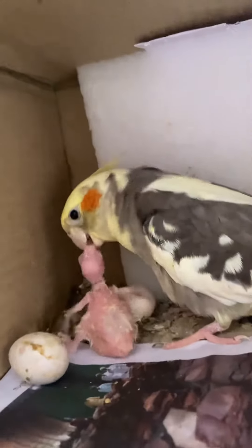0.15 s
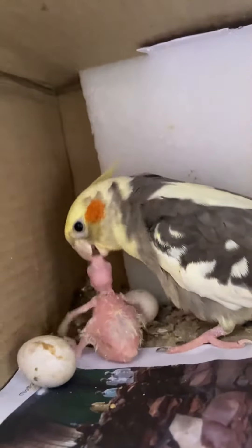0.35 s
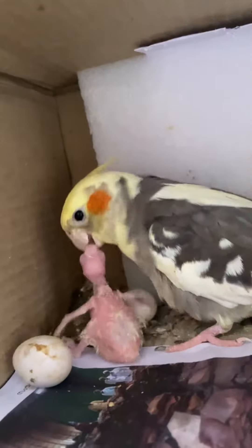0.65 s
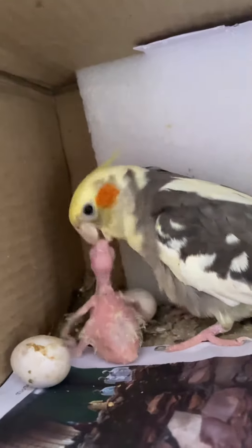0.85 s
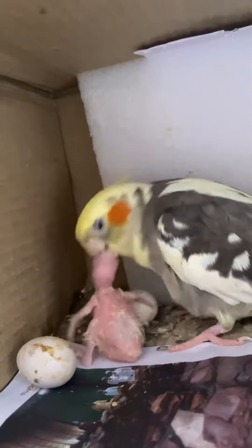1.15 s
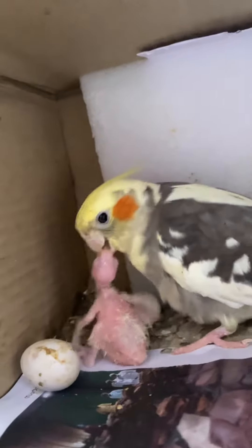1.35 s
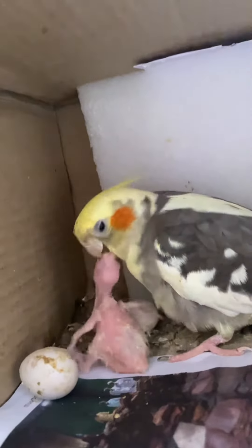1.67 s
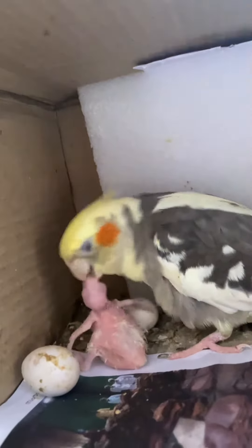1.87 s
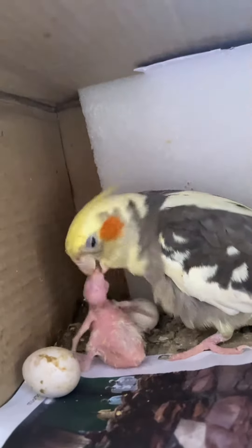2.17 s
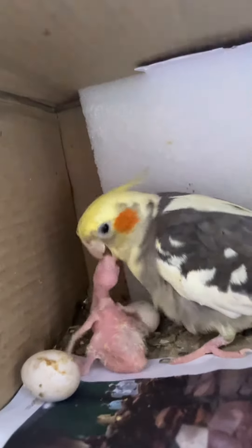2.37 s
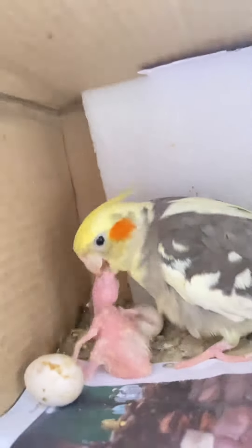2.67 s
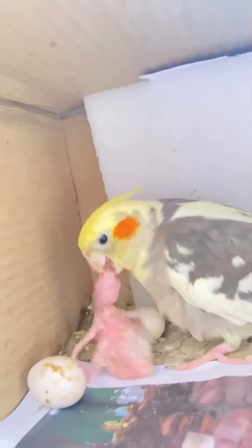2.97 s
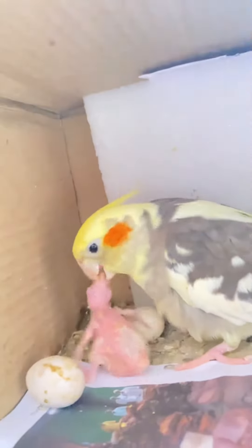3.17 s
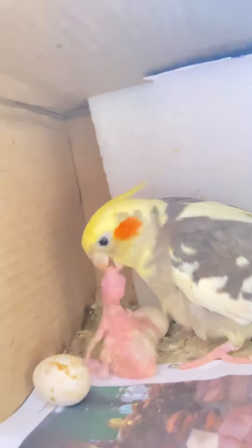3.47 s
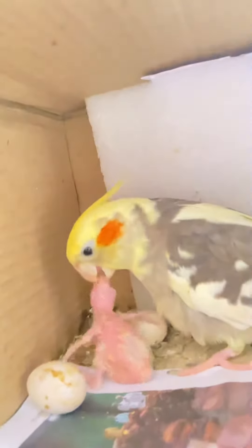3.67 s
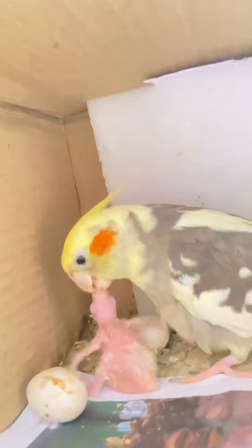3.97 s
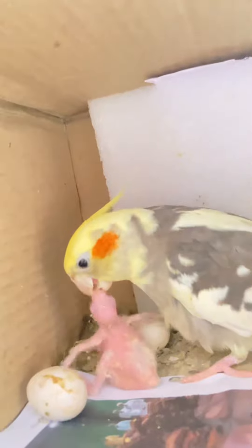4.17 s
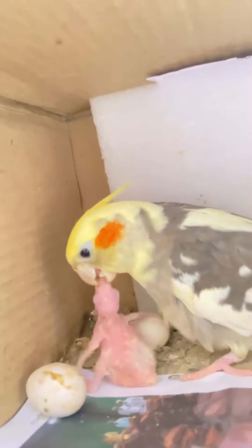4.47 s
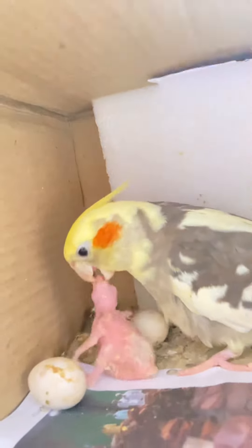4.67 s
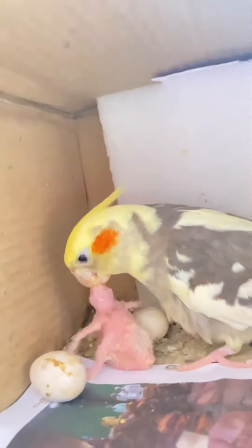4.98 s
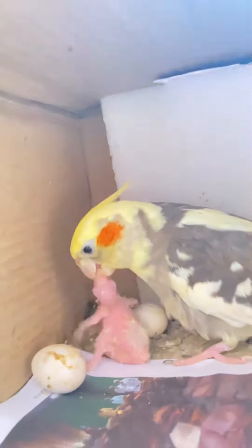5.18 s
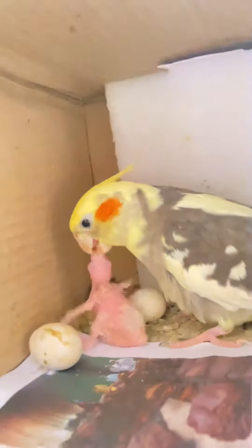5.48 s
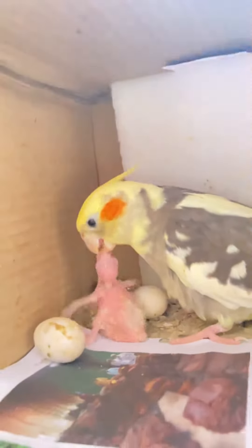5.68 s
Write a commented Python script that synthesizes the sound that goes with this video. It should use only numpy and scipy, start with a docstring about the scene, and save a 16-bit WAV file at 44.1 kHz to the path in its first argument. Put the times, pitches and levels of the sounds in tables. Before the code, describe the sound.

A close stereo sound inside a cardboard nest box lasts nearly six seconds. A tiny chick squeaks regularly, about five times a second from 0.2 s to the end; each squeak is a very short, bright, fast downward sweep around 4 to 5 kHz, with shrill overtones. Between them come wet clicks, smacks and a grainy, moist rustle, busier at the start, around 2 s and at the end. A sharp click falls at 1.5 s and a hollow beak tap at 4.0 s. Dull cardboard bumps occur at 0.95, 4.55, 5.3 and, strongest, 5.7 s, with weaker ones between. In the reverberant room behind, another bird gives a loud harsh leaping chirp at 0.65 s and a rough, weaker one at 5.1 s. Faint pure whistles climb slowly and drop near 2.1 and 4.3 s, one just ending at the start. Low rumble, wavering hum and thin hiss continue, the rumble heaviest in the first moments.

```python
"""In a cardboard nest box, close to the microphone, a cockatiel feeds its tiny chick.
The chick's squeaks are quick downward sweeps, about five a second. Noise bursts make wet beak clicks,
and sliding low tones make the bumps of the pumping adult against the box.
Farther off in the room, other birds give two harsh chirps and slow arched whistles, built from gliding
tones. Beneath lie a low rumble, hum and hiss, made of filtered noise and low tones."""
import sys
import numpy as np
from scipy import signal
from scipy.fft import rfft, irfft, next_fast_len
from scipy.io import wavfile
from scipy.ndimage import uniform_filter1d

SR = 44100
rng = np.random.default_rng(int(sys.argv[2]) if len(sys.argv) > 2 else 0)


def transcribe(signal):
    """Save signal, clipped to [-1, 1], as a 16-bit WAV file at the path in sys.argv[1]."""
    frames = np.atleast_2d(signal).T
    limited = np.clip(frames, -1, 1)
    pcm = np.round(limited * 32767).astype(np.int16)
    wavfile.write(sys.argv[1], SR, pcm)


N = 257103
TIME = np.arange(N) / SR


def from_db(db):
    """Turn decibels into an amplitude factor."""
    return 10 ** (np.asarray(db) / 20)


def rms_one(x):
    """Scale a sound to an rms level of 1."""
    return x / np.sqrt(np.mean(x ** 2) + 1e-20)


def in_time(rows):
    """Join the points of a curve by straight lines, one value per sample for each column."""
    s, *columns = np.transpose(rows)
    return [np.interp(TIME, s, column) for column in columns]


def add(out, s, sound):
    """Mix a short sound in at time s."""
    i = max(round(s * SR), 0)
    out[i:i + len(sound)] += sound[:N - i]


def gate(start, end, attack_s, release_s):
    """Rise from 0, hold at 1 and fall back to 0."""
    rise = (TIME - start) / attack_s
    fall = (end - TIME) / release_s
    return np.clip(np.minimum(rise, fall), 0, 1)


def flutter(rate_hz, size=N):
    """Smooth random wandering with an rms of 1: noise through two equal low-pass stages."""
    r = np.exp(-2 * np.pi * rate_hz / SR)
    return rms_one(signal.lfilter([1], [1, -2 * r, r * r], rng.standard_normal(size)))


def colour(x, spectrum):
    """Boost or cut each pitch region, following (f/Hz, level/dB) points."""
    hz, db = np.transpose(spectrum)
    size = next_fast_len(N)
    bins = np.maximum(np.fft.rfftfreq(size, 1 / SR), 1)
    gain = from_db(np.interp(np.log(bins), np.log(hz), db))
    return irfft(rfft(x, size) * gain, size)[..., :N]


def echoes(x, returns):
    """A sound with its separate returns from walls, each a delayed copy."""
    return x + sum(from_db(db) * np.pad(x, (round(delay * SR), 0))[:N] for delay, db in returns)


# how far the right microphone port lags behind the left: (f/Hz, phase lag/rad)
PORT_PHASE_LAG = [(0, 0), (400, .6), (1400, 2.4), (3000, 2.3), (3650, 2.0), (3900, 4.3), (4400, 4.9),
                  (5300, 6.6), (7900, 9.3), (11700, 12.5), (13800, 12.7), (16000, 15)]


def ports(x):
    """Sound reaches the right port a little after the left one, as a phase lag that depends on pitch."""
    size = next_fast_len(N + 512)
    lag = np.interp(np.fft.rfftfreq(size, 1 / SR), *np.transpose(PORT_PHASE_LAG))
    right = irfft(rfft(x, size) * np.exp(-1j * lag), size)[:N]
    return np.array([x, right])


def reverb(x, t60, gap_s, apart_db=-8):
    """Dense reflections that start after a gap and die away, partly different at each port."""
    t = TIME[:int((t60 + gap_s) * SR)]
    tails = rng.standard_normal((3, len(t))) * from_db(-60 * t / t60) * (t > gap_s)
    tails /= np.sqrt(np.sum(tails ** 2, axis=1, keepdims=True))
    wet = signal.fftconvolve(x[None], tails, axes=1)[:, :N]
    return ports(wet[0]) + from_db(apart_db) * wet[1:]


# spectrum of the rumble, before its level curve: (f/Hz, level/dB per Hz)
RUMBLE_SPECTRUM = [(20, -89), (40, -79), (62, -81.5), (95, -71), (160, -77.5), (300, -86), (420, -96),
                   (700, -97.5), (1350, -102), (1800, -113), (2700, -114), (5000, -120), (10000, -130)]
# spectrum of the hiss: (f/Hz, level/dB per Hz)
HISS_SPECTRUM = [(2400, -126), (3100, -112), (3700, -107), (5200, -112), (8000, -117), (9500, -102),
                 (10800, -121), (16000, -126)]
# hum tones, before the wavering and the rumble's level curve: (f/Hz, rms level/dB)
HUM_TONES = [(58.3, -54), (80.5, -54), (140, -60.5)]
# level curve of the rumble and hum: (t/s, level/dB)
RUMBLE_LEVEL = [(0, 10), (.35, 2.5), (5.8, -0.5)]


def background(apart_db=-10, waver=0.8):
    """Low rumble and faint hiss from coloured noise, with hum tones that waver in strength and phase."""
    white = rng.standard_normal((3, N)) * np.sqrt(SR / 2)
    swell = from_db(in_time(RUMBLE_LEVEL)[0])
    noise = swell * colour(white, RUMBLE_SPECTRUM) + colour(white[::-1], HISS_SPECTRUM)
    hum = np.zeros(N)
    for hz, db in HUM_TONES:
        strength = from_db(db) * np.sqrt(2) * (1 + waver * flutter(4.3))
        hum += strength * np.sin(2 * np.pi * hz * TIME + flutter(2.9))
    return ports(noise[0] + swell * hum) + from_db(apart_db) * noise[1:]


# the narrow band of the distant chirr: (f/Hz, level/dB)
CHIRR_COLOUR = [(2400, -6.5), (3200, 11), (3650, 12.5), (4300, -2), (7000, -76)]


def chirr(flutter_hz=3, level_db=-67, swell_db=4.5):
    """A faint, narrow, distant hiss whose level comes and goes at random."""
    hiss = rms_one(colour(rng.standard_normal(N), CHIRR_COLOUR))
    return from_db(level_db + swell_db * flutter(flutter_hz)) * hiss


# a whistle starts this long before its top and nearly this far below it; the bend is the final climb's width
CLIMB_S, CLIMB_OCTAVES, CLIMB_BEND_S = .39, .3, .1
# it holds near the top briefly, then drops and fades
TOP_HOLD_S, DROP_OCTAVES_PER_S, DROP_DB_PER_S = .045, 5.2, 90
WHISTLE_JITTER = .003  # share by which the pitch wanders
# far whistles: (t of the top/s, top f/Hz, level at the top/dB, swell before it/dB per s)
WHISTLES = [(-.05, 1414, -42, 32), (2.114, 1378, -43, 46), (4.301, 1416, -44, 20)]


def whistles(knee_s=0.0092, attack_s=0.037, drop_s=0.077):
    """An almost pure tone that swells as it climbs slowly, then falls quickly and fades."""
    out = np.zeros(N)
    for top_s, top_hz, db, swell_db_per_s in WHISTLES:
        to_top = np.maximum(top_s - TIME, 0)
        # time spent dropping, with a rounded start
        dropping = knee_s * np.logaddexp(0, (TIME - top_s - TOP_HOLD_S) / knee_s)
        climb = CLIMB_OCTAVES * to_top ** 2 / (to_top ** 2 + CLIMB_BEND_S ** 2)
        octaves_below = climb + DROP_OCTAVES_PER_S * dropping
        pitch = top_hz * 2 ** -octaves_below
        phase = 2 * np.pi * np.cumsum(pitch * (1 + WHISTLE_JITTER * flutter(52))) / SR
        level = from_db(db - swell_db_per_s * to_top - DROP_DB_PER_S * dropping)
        span = gate(top_s - CLIMB_S, top_s + TOP_HOLD_S + drop_s, attack_s, attack_s)
        out += np.sin(phase) * level * span
    return out


# the sharpest beak clicks and smacks, and at 5.331 s the click of a bump on the box: (t/s, level before
# colouring/dB, decay/s)
CLICKS = [(0.029, -58, 0.016), (0.209, -54, 0.0014), (0.924, -58, 0.007), (0.935, -60, 0.015),
          (1.224, -53, 0.0014), (1.5245, -45, 0.00031),  (2.163, -56, 0.0025), (3.209, -53, 0.001),
          (3.48, -56, 0.012), (3.51, -58.5, 0.0082), (3.567, -66.5, 0.096), (3.809, -54, 0.0011),
          (3.965, -51, 0.0016), (4.111, -57, 0.0018), (4.258, -61.5, 0.0035), (4.563, -55, 0.004),
          (4.642, -57.5, 0.0065), (4.94, -56.5, 0.012), (5.168, -58, 0.0017), (5.331, -52, 0.024),
          (5.703, -53.5, 0.0026)]
# hollow taps of beak on beak: (t/s, level/dB, f/Hz)
TAPS = [(1.223, -40, 1520), (3.964, -28.5, 2100)]
# tone colour of clicks and rustle: (f/Hz, level/dB)
CLICK_COLOUR = [(500, 12), (1800, 14), (2700, 6), (4200, 10.5), (7000, 8.5), (9500, 15), (12000, 5),
                (16000, 4.5)]
# the rustle comes in patches: depth in dB, rate of the wandering in Hz
RUSTLE_SWELL_DB, RUSTLE_FLUTTER_HZ = 3.5, 7


def beaks(feeding, base_grains_per_s=90, grain_s=0.0034, crackle_db=-70.5, spread_db=6):
    """Beak clicks are noise bursts and taps short tones, over a rustle of wet food and bedding in grains."""
    clicks, taps, t = np.zeros(N), np.zeros(N), TIME[:SR // 20]
    for s, db, decay_s in CLICKS:
        add(clicks, s, from_db(db) * rng.standard_normal(len(t)) * np.exp(-t / decay_s))
    for s, db, hz in TAPS:
        add(taps, s, from_db(db) * np.sin(2 * np.pi * hz * t) * np.exp(-t / 0.00092))
    # busier feeding brings more grains
    starts = rng.random(N) < base_grains_per_s * feeding / SR
    grains = starts * from_db(spread_db * np.minimum(rng.exponential(1, N), 3))
    decay = np.exp(-1 / (grain_s * SR))
    crackle = signal.lfilter([1], [1, -decay], grains + 1e-18) * rng.standard_normal(N)
    crackle *= from_db(RUSTLE_SWELL_DB * flutter(RUSTLE_FLUTTER_HZ))
    rustle = from_db(crackle_db) * np.sqrt(feeding) * rms_one(colour(crackle, CLICK_COLOUR))
    return taps + colour(clicks, CLICK_COLOUR) + rustle


# every squeak slides down fast at first and then more gently; its start and end are smoothed
SLIDE_SETTLE_S, SQUEAK_ATTACK_S, SQUEAK_RELEASE_S = .0205, .0048, .0021
# its overtones bloom around this share of its length, this wide
BLOOM_AT, BLOOM_WIDTH = 0.59, 0.35
# the chick's squeaks: (t/s, length/s, middle f/Hz, slide at the middle/octaves per s,
# base level/dB, 2nd harmonic level/dB, 3rd harmonic level/dB)
SQUEAKS = [(0.1777, 0.012, 4356, 51, -28.5, -1.5, 1.5), (0.3695, 0.014, 4360, 48, -30, 6.5, 1.5),
           (0.5625, 0.019, 4530, 40, -29.5, 3, 3.5), (0.7558, 0.0175, 4450, 38, -36.5, 8.5, -0.5),
           (0.9434, 0.02, 4690, 42, -32, 3, -2), (1.1499, 0.013, 4400, 54.5, -27.5, -2.5, -11),
           (1.3364, 0.01, 4610, 63, -25, 0.5, -7), (1.527, 0.013, 4346, 35.6, -26.5, 1, 0.5),
           (1.7116, 0.016, 4097, 47, -33.5, -5, -7.2), (1.9077, 0.018, 4300, 46, -31.5, -11, -19),
           (2.1, 0.018, 4246, 55, -34.5, -8.5, -4.5), (2.3172, 0.011, 3910, 42, -29, -5.5, -22),
           (2.5155, 0.0092, 4220, 57, -27.8, 0, 0.5), (2.7021, 0.014, 4000, 46, -30.1, -10, -16.5),
           (2.9028, 0.016, 4294, 37, -33, 2, -8.5), (3.1268, 0.018, 4800, 44, -30.5, 2.2, -18.1),
           (3.3404, 0.022, 4810, 35.7, -29.5, -5.5, -18.4), (3.5882, 0.013, 4270, 51, -31.5, 7, -8.0),
           (3.7868, 0.015, 4270, 50, -28.5, 3, -7.4), (3.989, 0.015, 4460, 41, -32, 8, -2),
           (4.1883, 0.012, 4130, 62, -32, 8, -3), (4.3817, 0.016, 4500, 49, -28.5, 8, -10),
           (4.5783, 0.019, 4572, 41, -28.5, 8.5, -9), (4.7701, 0.019, 4660, 50, -31.5, 6.5, -14),
           (4.9656, 0.018, 4480, 46, -32, 8, -4.5), (5.158, 0.018, 4370, 44, -32, 6.5, -8),
           (5.3441, 0.018, 4500, 42, -36, 10.5, -6), (5.5262, 0.015, 4364, 46, -34, 9, -0.5),
           (5.7185, 0.021, 4720, 43, -34.5, 11, -1)]
# the chick's throat and the box walls: (f/Hz, level/dB)
THROAT = [(3200, -13.5), (4300, 3.5), (5000, -2), (5600, -0.5), (6600, -8.4), (8700, 1), (10000, -3.5),
          (11000, -9.5), (12400, -3.5), (15000, -11)]
# return of a squeak from the nearest wall of the box: (delay t/s, level/dB)
NEAR_WALL = [(.0038, -15)]


def chick(feeding, third_power=1.44, fourth_db=-26, jitter=0.011, shimmer=0.48, rasp_db=-25):
    """Each squeak sweeps swiftly down; overtones bloom inside it, and food in the throat adds a splutter."""
    voice, splutter = np.zeros(N), np.zeros(N)
    t = TIME[:SR // 30]
    for s, length, hz, slide, db, second_db, third_db in SQUEAKS:
        slide_s = SLIDE_SETTLE_S * (1 - np.exp(-(t - length / 2) / SLIDE_SETTLE_S))
        pitch = hz * 2 ** (-slide * slide_s)
        phase = 2 * np.pi * np.cumsum(pitch * (1 + jitter * flutter(600, size=len(t)))) / SR
        swell = np.minimum(t / SQUEAK_ATTACK_S, 1) / (1 + np.exp((t - length) / SQUEAK_RELEASE_S))
        bloom = np.exp(-((t / length - BLOOM_AT) / BLOOM_WIDTH) ** 2)
        partials = [(1, 0.85), (2, from_db(second_db) * bloom),
                    (3, from_db(third_db) * bloom ** third_power), (4, from_db(fourth_db) * bloom)]
        squeak = np.zeros(len(t))
        for k, strength in partials:
            audible = k * pitch < SR / 2  # leave out what is too high for the sample rate
            squeak += strength * np.sin(k * phase) * audible * (1 + shimmer * flutter(276, size=len(t)))
        add(voice, s, np.sqrt(2) * from_db(db) * swell * squeak)
        add(splutter, s, from_db(db) * swell * bloom)
    rasp_colour = [(1500, 5.0), (4500, -1), (7000, 2), (9500, -18), (15000, 5.5)]  # (f/Hz, level/dB)
    rasp = rms_one(colour(rng.standard_normal(N), rasp_colour))
    return echoes(colour(voice, THROAT), NEAR_WALL) + from_db(rasp_db) * splutter * feeding * rasp


# roughness as shares: shake of the pitch, of the note's level, of the overtones and rasp
CHIRP_JITTER, CHIRP_SHIMMER, CHIRP_GRIT = .026, .35, .5
HARSH_ATTACK_S, HARSH_RELEASE_S = 0.016, 0.034
# the voice cracks where the pitch leaps: it loses up to this much, in full at this speed
CRACK_DB, CRACK_OCTAVES_PER_S = 16, 90
# two chirps, each a low note, an arch and a low note again: (t/s, f/Hz, pure note's base level/dB)
CHIRPS = [
    [(.634, 1346, -25.5), (.646, 1373, -35.5), (.649, 1627, -32), (.656, 2266, -20.5), (.663, 2468, -35),
     (.671, 2413, -32), (.678, 2850, -35.5), (.688, 2928, -35), (.706, 3032, -26), (.722, 2797, -37),
     (.729, 2740, -21.5), (.734, 1853, -27), (.747, 2030, -26), (.750, 1363, -27), (.760, 1500, -22.5),
     (.767, 1300, -70), (.778, 1400, -29), (.785, 1310, -36)],
    [(5.120, 1391, -39), (5.131, 1455, -36), (5.134, 2116, -35), (5.149, 2173, -28), (5.152, 2614, -50),
     (5.180, 2737, -44), (5.186, 2442, -30.5), (5.208, 2514, -31), (5.211, 1475, -35), (5.222, 1470, -27),
     (5.228, 1326, -41), (5.238, 1310, -22.5), (5.251, 1300, -34)],
]
# harshness of each chirp, however loud its pure note is, before cracks and throat colour:
# (overtones level/dB, lines between them level/dB, rasp level/dB)
HARSH_LEVELS = [(-42.5, -55, -48.5), (-49, -52, -47.5)]
# the throat favours some overtones: (f/Hz, level/dB)
OVERTONE_COLOUR = [(2800, -2.5), (4000, 0.5), (5000, -4), (5900, -7.5), (7200, -3.5), (9000, -15),
                   (11000, -28.5), (15000, -33)]
# tone colour of the chirps' rasp: (f/Hz, level/dB)
RASP_COLOUR = [(800, -42), (1300, -12), (2000, 6), (3000, 5), (4500, -3), (6000, -13), (15000, -39)]


def chirps():
    """A harsh call leaps up in pitch and drops back in steps; where its pure note is weak it shakes and splits."""
    out = np.zeros(N)
    rasp = rms_one(colour(rng.standard_normal(N), RASP_COLOUR) * (1 + CHIRP_GRIT * flutter(130)))
    for call, (overtones_db, halves_db, rasp_db) in zip(CHIRPS, HARSH_LEVELS):
        hz, db = in_time(call)
        start, end = call[0][0], call[-1][0]
        leap = uniform_filter1d(np.abs(np.gradient(np.log2(hz))) * SR, size=100)
        crack = from_db(-CRACK_DB * np.minimum(leap / CRACK_OCTAVES_PER_S, 1))
        strain = gate(start, end, HARSH_ATTACK_S, HARSH_RELEASE_S)
        shake = np.sqrt(strain * from_db(rasp_db - db))
        phase = 2 * np.pi * np.cumsum(hz * (1 + CHIRP_JITTER * shake * flutter(390))) / SR
        # every overtone comes and goes on its own
        overtones = np.zeros(N)
        for k in range(2, 6):
            strength = from_db(np.interp(k * hz, *np.transpose(OVERTONE_COLOUR)))
            overtones += strength * (1 + CHIRP_GRIT * flutter(190)) * np.sin(k * phase)
        # unequal alternate cycles put lines between the harmonics
        halves = sum(flutter(52) * np.sin((k + .5) * phase) for k in (0, 1, 2))
        harsh = strain * (from_db(overtones_db) * overtones + from_db(halves_db) * halves)
        note_gate = gate(start, end, attack_s=0.0039, release_s=0.0083)
        note = from_db(db) * np.sin(phase) * (1 + CHIRP_SHIMMER * flutter(62)) * note_gate
        out += crack * (note + harsh) + from_db(rasp_db) * strain * rasp
    # the pitch sweeps through peaks and dips of tone colour, which breaks the call into patches
    return colour(out, [(1900, 0), (2350, -16.5), (2800, 7.5), (5700, 4.5), (6600, -3.0), (7800, 13)])


# bumps on the cardboard: (t/s, base level/dB, starting f/Hz)
BUMPS = [(0.945, -30, 420), (1.226, -44, 960), (3.806, -39, 720), (3.996, -36.5, 720), (4.563, -26.5, 890),
         (5.131, -38.5, 675), (5.3298, -22, 1174), (5.7048, -17, 1377)]
# the dull shudder of the cardboard after a bump: (f/Hz, level/dB)
SHUDDER_COLOUR = [(100, -5), (260, 1), (450, -3), (620, -14), (850, -10.5), (1200, -20.5), (3000, -39)]


def bumps(rest_hz=205, spread_s=0.0026, attack_s=0.0011, decay_s=0.0054, shudder_db=-13, shudder_s=0.017):
    """Bending waves in cardboard arrive highs first: a bump slides down in pitch, with a brief dull shudder."""
    thuds, shaking, t = np.zeros(N), np.zeros(N), TIME[:SR // 5]
    for s, db, hz in BUMPS:
        pitch = rest_hz + (hz - rest_hz) * np.exp(-t / spread_s)
        phase = 2 * np.pi * np.cumsum(pitch) / SR
        onset = from_db(db) * (1 - np.exp(-(t / attack_s) ** 2))
        add(thuds, s, onset * np.sin(phase) * np.exp(-t / decay_s))
        add(shaking, s, onset * np.exp(-t / shudder_s))
    shudder = rms_one(colour(rng.standard_normal(N), SHUDDER_COLOUR))
    return thuds + from_db(shudder_db) * shaking * shudder


# the box rings very briefly, and little of the room comes back into it
BOX_DB, BOX_T60_S, NEST_ROOM_DB = -18.5, .024, -25.5
# how busy and wet the feeding is: (t/s, level/dB)
FEEDING = [(0, 7), (.9, -1.5), (1.3, 0.5), (2.0, 9.5), (2.95, -1.5), (3.5, 6.5), (5.0, 5.5), (5.8, 12)]
# cardboard and feathers soak up the treble of reflections: (f/Hz, level/dB)
WALLS = [(4500, 0), (7000, -8), (15000, -9)]
# returns of the whistle from far walls: (delay t/s, level/dB)
FAR_WALLS = [(.085, -13), (0.289, -17)]
# the right port against the left: (f/Hz, level/dB)
RIGHT_PORT = [(80, .3), (140, -.2), (500, 2), (1300, .8), (2700, -.2), (4400, .7), (8500, 0)]


def scene():
    """Near sounds ring briefly in the box; far ones carry more of the room."""
    feeding = from_db(in_time(FEEDING)[0])
    near = chick(feeding) + beaks(feeding) + bumps()
    calls, far = chirps(), whistles()
    dull = colour(near, WALLS)
    box = from_db(BOX_DB) * reverb(dull, t60=BOX_T60_S, gap_s=0.0021, apart_db=3)
    nest_room = from_db(NEST_ROOM_DB) * reverb(dull, t60=0.099, gap_s=0.011, apart_db=0.5)
    nest = ports(near) + box + nest_room
    call_room = from_db(-19.5) * reverb(colour(calls, WALLS), t60=0.44, gap_s=0.0043, apart_db=1.5)
    # the room prolongs the whistle
    whistle_room = from_db(-15.0) * reverb(far, t60=1.5, gap_s=0.016, apart_db=6)
    flock = ports(calls + echoes(far, FAR_WALLS) + chirr()) + call_room + whistle_room
    left, right = nest + flock + background()
    return np.array([left, colour(right, RIGHT_PORT)])


def record(dry):
    """The top is cut steeply above 16300 Hz, by a low-pass run forwards and backwards."""
    return signal.sosfiltfilt(signal.butter(16, 16300, fs=SR, output="sos"), dry)


dry = scene()
out = record(dry)
transcribe(out)
```